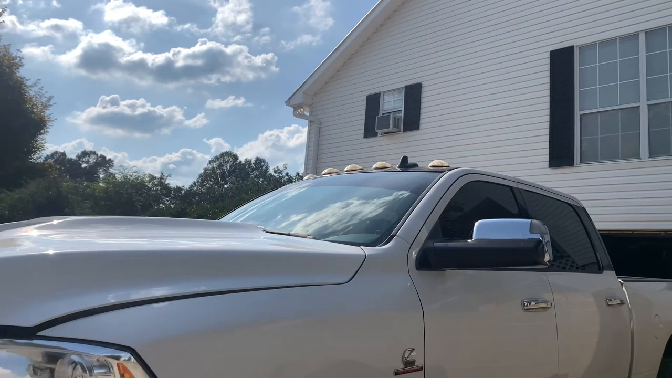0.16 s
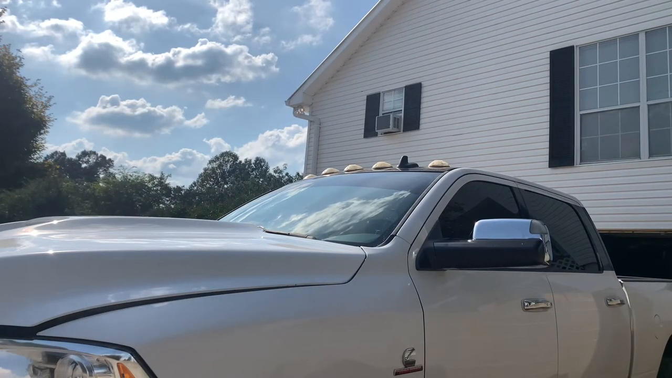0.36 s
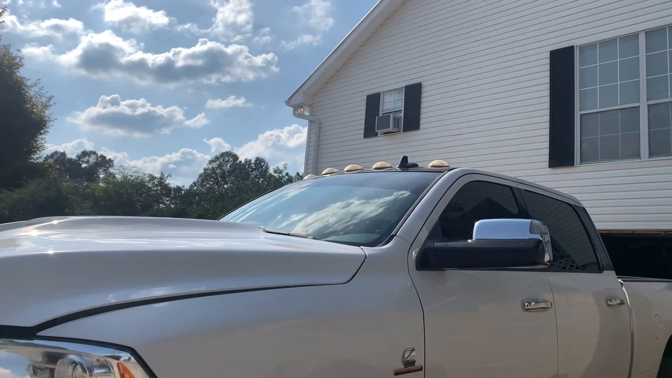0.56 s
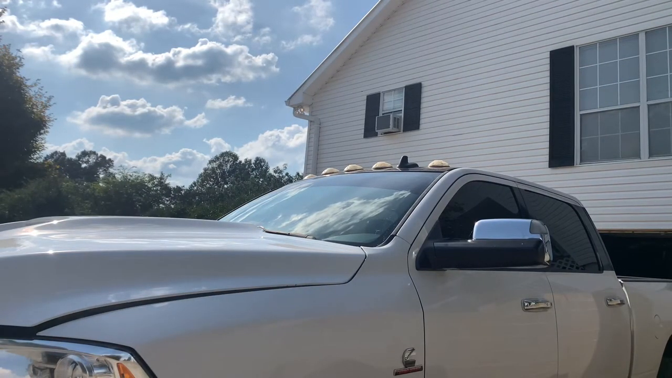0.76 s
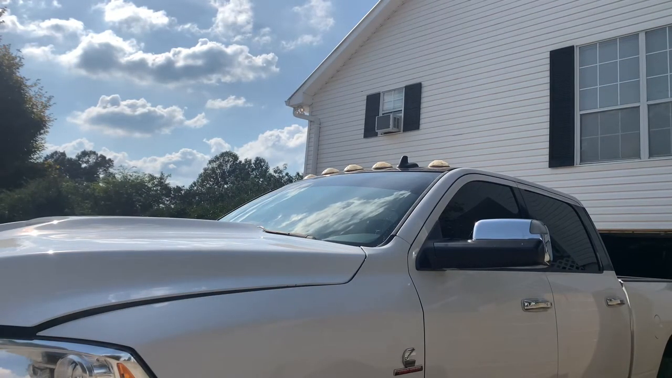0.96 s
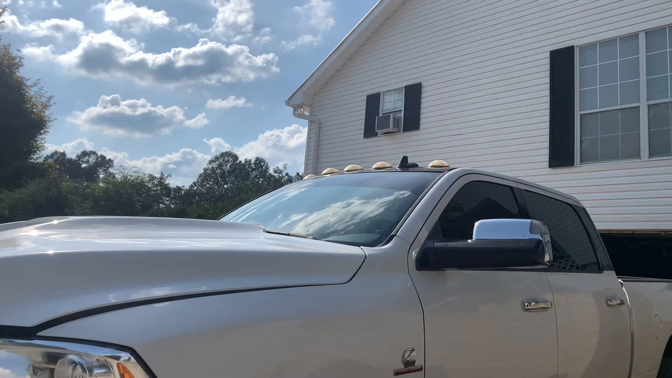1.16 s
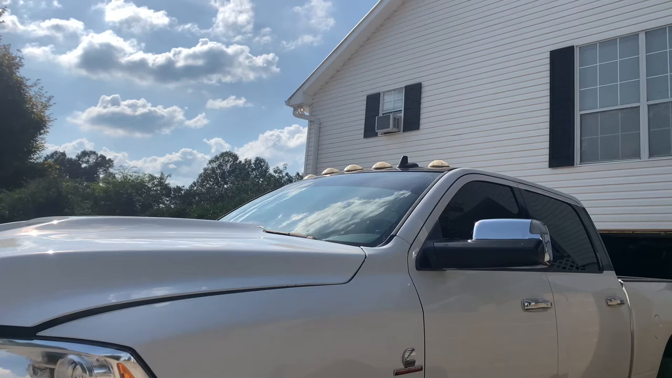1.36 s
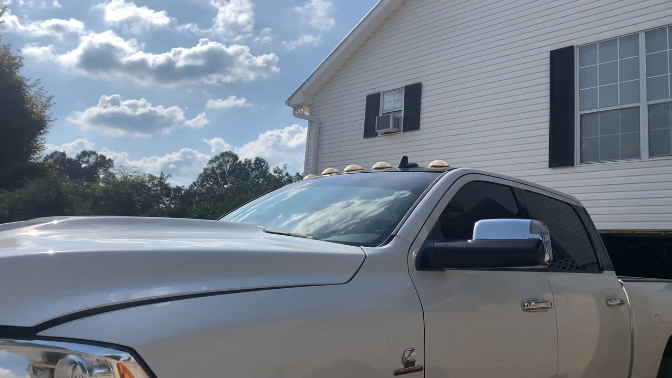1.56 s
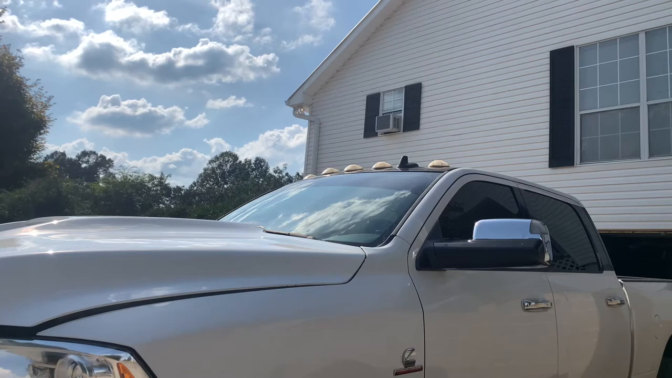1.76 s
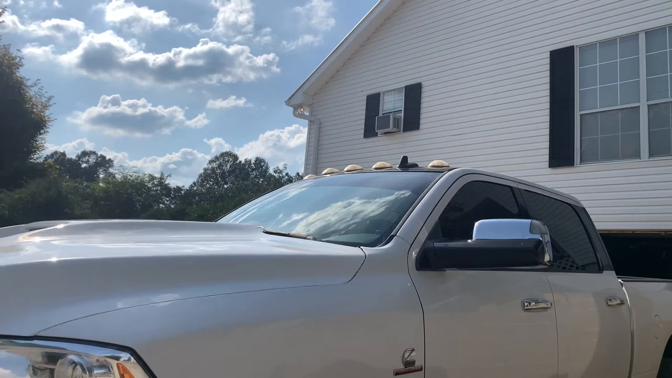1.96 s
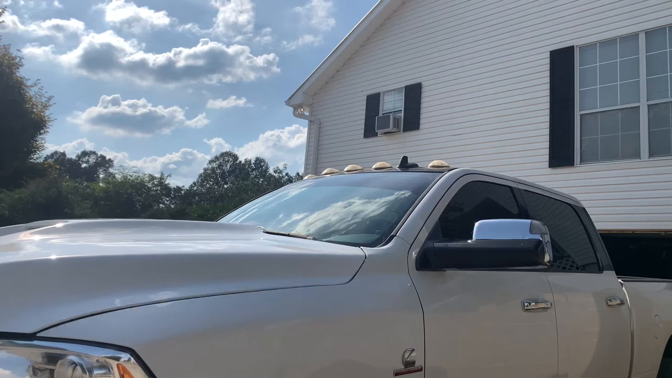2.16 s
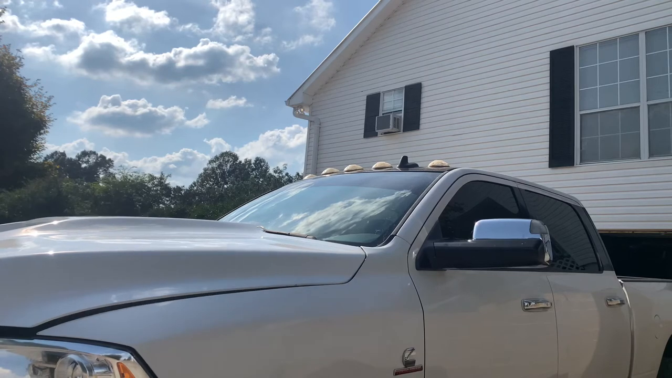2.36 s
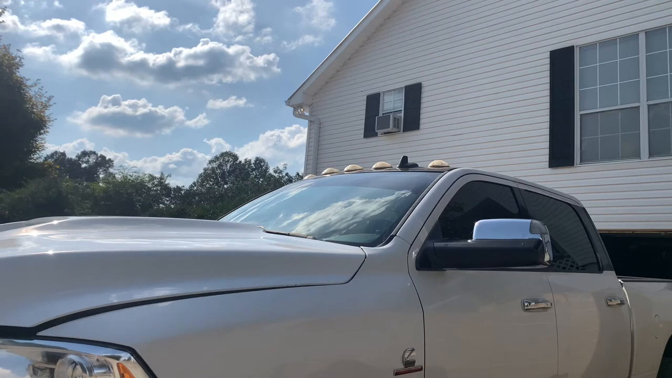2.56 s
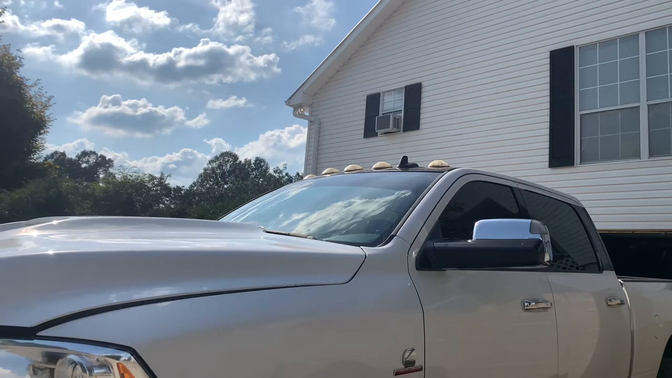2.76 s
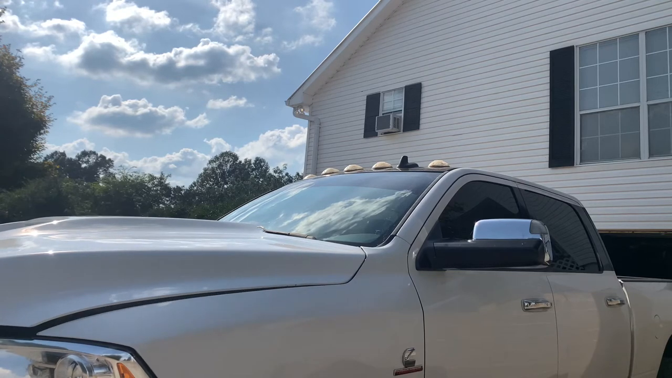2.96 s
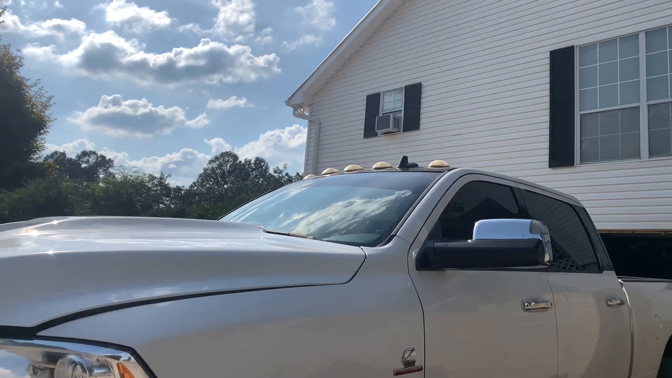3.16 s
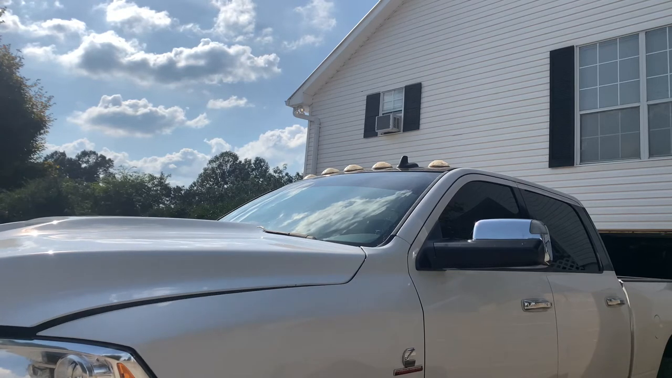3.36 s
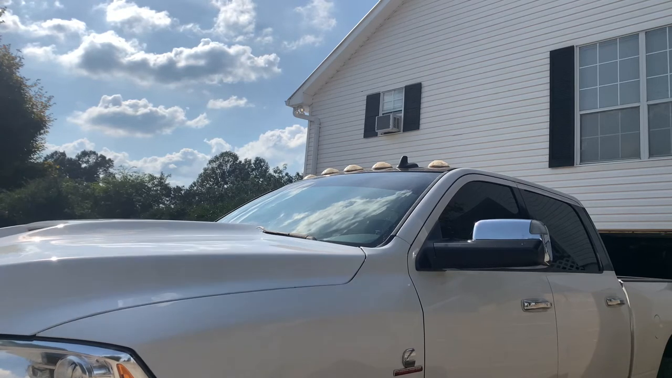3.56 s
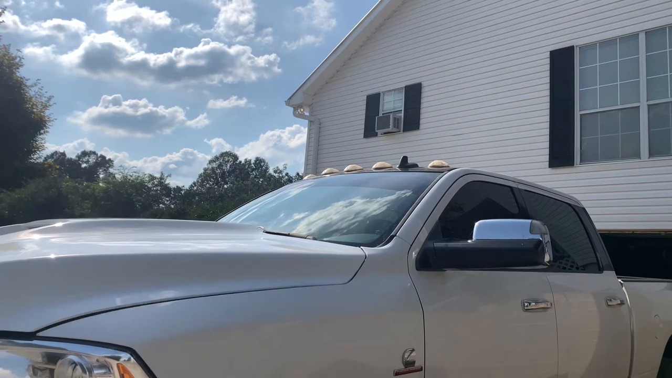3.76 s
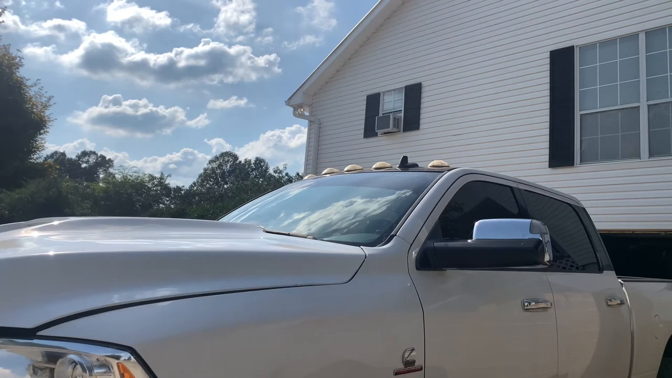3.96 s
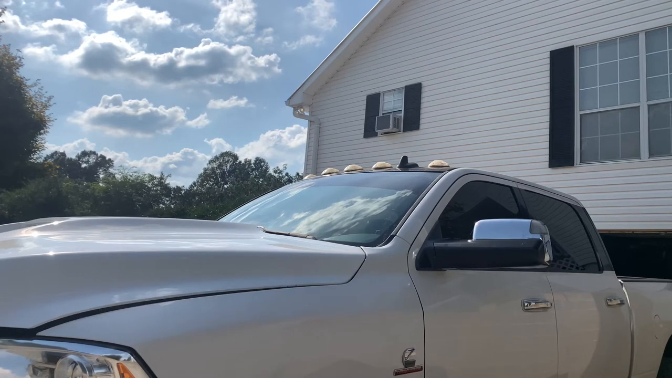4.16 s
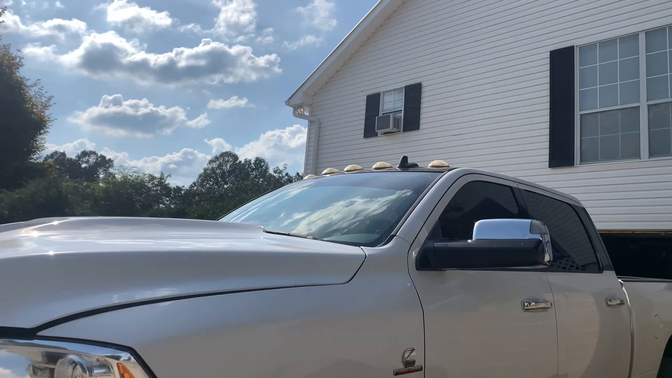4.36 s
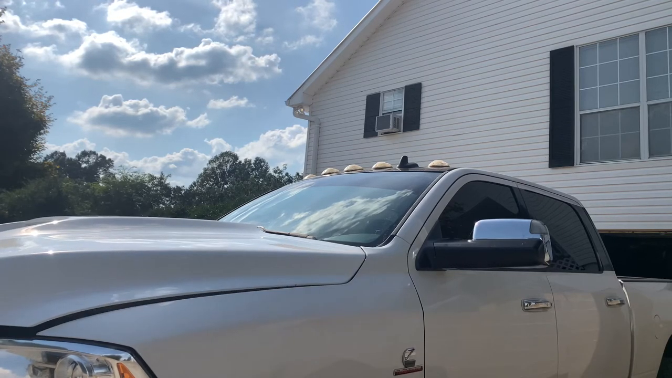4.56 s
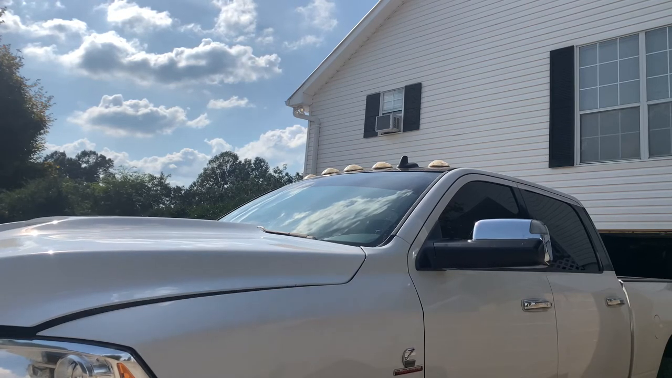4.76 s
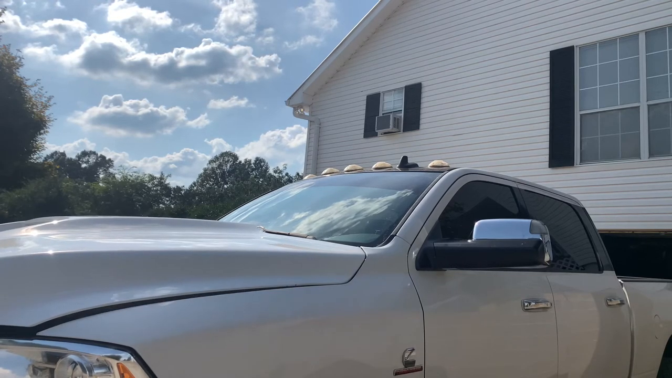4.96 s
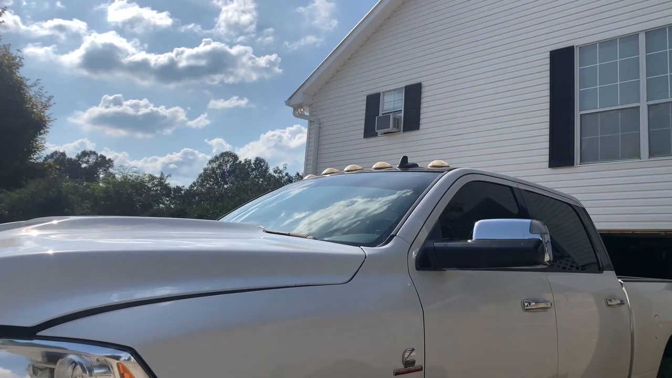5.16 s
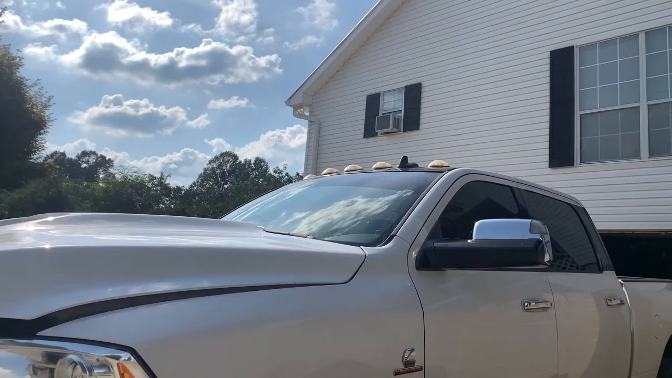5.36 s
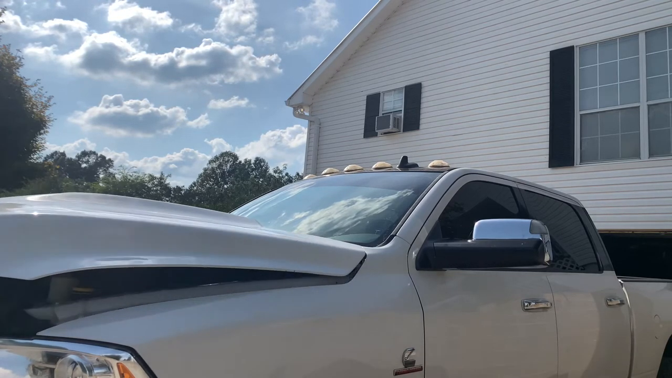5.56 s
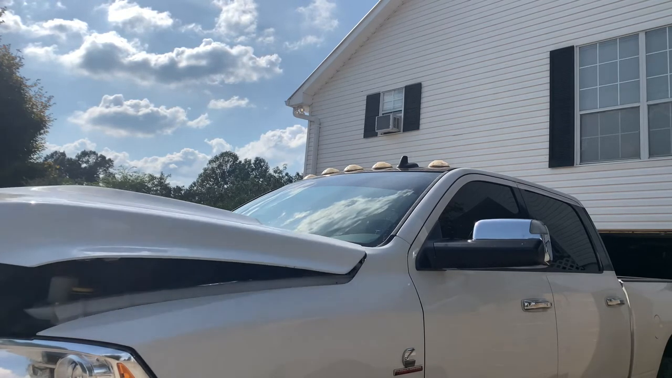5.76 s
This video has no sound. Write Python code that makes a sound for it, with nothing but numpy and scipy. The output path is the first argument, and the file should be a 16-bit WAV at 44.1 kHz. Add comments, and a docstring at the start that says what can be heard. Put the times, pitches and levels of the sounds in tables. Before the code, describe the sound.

A quiet yard with a low, slightly wavering machine hum, soft air, faint high hiss and far traffic that fades. From 0.1 to 0.6 s, hands scuff lightly on paint and a couple of small steel latch parts tick. At about 1.94 s the fiberglass hood slams onto its latch: a sharp steel crack, then a heavy hollow thump with deep boom, quick rebounds and a short panel shudder, answered by a diffuse house-wall echo. A faint latch touch follows at 2.2 s. A second slam lands at 3.43-3.55 s, similarly hard, and a small touch follows at 3.78 s. From 4.0 to 5.0 s, hands rub with dry little squeaks and the catch is fumbled in quick metallic clicks. A dull light knock comes at 5.03 s, then at 5.36 s the catch releases with a bright bang and brief springy rattling bounce, dying back into the hum by about 5.8 s.

```python
"""First a quiet outdoor bed is heard: a machine hum, air, two bands of hiss and far traffic that fades and wavers.
Hands scuff and squeak on paint (shaped noise) and small steel parts tick (short spikes with a ring).
A fibreglass pickup hood is pushed down onto its latch twice; then the catch is fumbled and lets go with a bang.
Each contact mixes bursts of noise with dying tones, from the steel latch down to the air under the hood.
A house wall and the yard answer with diffuse echoes, and two microphone ports make the stereo picture."""
import sys
import numpy as np
from scipy import signal
from scipy.fft import rfft, irfft, next_fast_len
from scipy.io import wavfile
from scipy.ndimage import map_coordinates

SR = 44100
rng = np.random.default_rng(int(sys.argv[2]) if len(sys.argv) > 2 else 0)


def wav_record(signal):
    """Record a signal, one row per channel, as 16-bit PCM in the file named by sys.argv[1]."""
    frames = np.transpose(np.atleast_2d(signal))
    bounded = np.clip(frames, -1, 1)
    # unit amplitude maps onto the largest positive 16-bit level
    quanta = np.round(bounded * 32767).astype(np.int16)
    wavfile.write(sys.argv[1], SR, quanta)


N = 256662  # length in samples

# Levels in the tables are set before the echoes and the microphone ports.
# far traffic over time: time_s, level_db
TRAFFIC_LEVEL = [(0, -57), (.5, -62), (1.2, -62.5), (1.8, -63.5), (2.5, -67.5), (3.4, -75), (4.1, -68.5),
                 (4.7, -73.5), (5.82, -69)]
# colour of the far traffic and of the air: frequency_hz, gain_db
TRAFFIC_COLOUR = [(250, -36.5), (500, -11), (1000, 1), (1800, 0), (2500, -11), (5000, -21.5), (8000, -54.5)]
AIR_COLOUR = [(25, -30), (45, 2.5), (75, -5), (130, -1.5), (250, -13), (320, -17.5), (700, -21),
              (1200, -27), (2000, -33), (4000, -47), (6000, -51), (9200, -48.5), (12000, -55),
              (15000, -72.5)]
# narrow bands of the machine hum, and the two bands of hiss: centre_hz, width_hz, level_db
HUM_BANDS = [(56.4, 11.3, -46), (113.9, 14, -50), (169, 26, -69), (229.9, 12, -61), (579, 4, -70.5)]
HISS_BANDS = [(7770, 1000, -74.5), (10940, 910, -82.5)]

# how fast the echoes of the house wall and the yard die: frequency_hz, time_to_fall_60_db_s
WALL_DECAY = [(200, 0.6), (1000, 0.22), (3000, 0.19), (10000, 0.11)]
YARD_DECAY = [(200, 0.5), (2000, 1), (10000, 0.54)]

# hands scuffing: middle_s, length_s, level_db, treble_over_body_db
SCUFFS = [(0.113, 0.03, -54.5, -10), (0.322, 0.065, -63, -9), (0.568, 0.027, -52, -8.5),
          (1.732, 0.11, -68.5, -8), (2.444, 0.1, -69, -7), (4.05, 0.1, -61, -15), (4.255, 0.027, -57, -4.5),
          (4.293, 0.043, -57.5, -13), (4.619, 0.077, -64, -15), (4.792, 0.12, -55.5, -5.5),
          (4.888, 0.067, -59.5, -1.5), (4.944, 0.24, -62.5, -10)]
# colour of the scuffs: frequency_hz, gain_db
SCUFF_COLOUR = [(900, -3), (1800, -3.5), (3500, -4.5), (6000, -10), (9000, -0.5), (11000, -10),
                (13000, -13), (16500, -25)]
# skin squeaking on paint: start_s, length_s, pitch_hz, level_db, octave_level_db
SQUEAKS = [(4.022, 0.044, 3370, -52, -20), (4.095, .1, 4300, -75, -12), (4.346, 0.22, 3300, -61.5, -10),
           (4.386, 0.18, 2710, -67, -40), (4.787, 0.15, 3860, -67, -20)]
# small latch parts clicking: start_s, level_db, pitch_hz
TICKS = [(0.223, -39, 3030), (.271, -48, 2230), (4.346, -54, 10300), (4.734, -51, 3060), (4.762, -37, 3300),
         (4.778, -30, 3220), (4.883, -39, 3720), (4.889, -34.5, 3300), (4.915, -47, 3300),
         (4.94, -54.5, 2330)]

# ringing tones of the hood's parts, deepest first: pitch_hz, level_db, time_to_fall_60_db_s
BOOM_TONES = [(66.5, 21, 0.36), (78.7, -4.5, 0.73)]  # the air under the hood
HOLLOW_TONES = [(114.4, 0, 0.31)]
DRUM_TONES = [(159, -3.5, 0.37), (176.6, -1.5, .25), (223.8, 6.5, 0.1266), (261, -3.5, 0.24)]
PANEL_TONES = [(291, -1, .28), (335, -3, .2), (377, 0, .22), (405, -3, .24), (470, -4, .22), (490, -6, .24),
               (540, -6, .24)]
RIB_TONES = [(583, -10, 0.42), (663.4, 2, 0.14), (756.3, 1, 0.16), (809, -3.5, 0.25), (899, 6.5, 0.036),
             (944, 2, 0.079), (1025, 1.5, 0.075), (1120, -3, 0.049)]
CLACK_TONES = [(1360, -4.5, .06), (1490, -18, .06), (1474, 2, .07), (1639, 27, 0.042), (1835, 7, 0.027),
               (1850, -13, 0.036)]
STEEL_TONES = [(2740, 2.5, 0.052), (3187, 0.5, 0.086), (3330, 3, 0.044), (3890, -7.5, 0.043),
               (4360, -3, 0.033), (4780, -9, 0.018), (5400, -8, 0.018), (5650, -2, 0.02)]  # the latch

# colours of the noise in a contact: frequency_hz, gain_db
CRACK_COLOUR = [(1800, -19.5), (2400, -0.5), (4300, -10.5), (5600, -8), (6600, -20), (7400, -42)]
FIZZ_COLOUR = [(5800, -26), (6600, -2.5), (8000, 2.5), (9000, 4.5), (11500, -1.5), (12800, 4.5),
               (13800, -16), (15500, -9), (17000, -42.5)]
RATTLE_COLOUR = [(550, -30), (800, 0), (1200, -2), (2000, -8), (2700, -30)]

# every contact: start_s, metal_db, body_db, depth_db (gained per octave down the body)
STRIKES = [(1.935, -17, -18.5, 2), (3.4565, -13.5, -25, -1)]  # the latch meets its steel striker
TOUCHES = [(2.1957, -42.5, -38.5, -8.5), (3.4276, -37, -26.5, 3), (3.7814, -46.5, -41.5, -4),
           (5.0255, -38, -30.5, -2)]  # the latch only brushes or leaves it
KNOCKS = [(1.9574, -9, -7.5, 1), (2.0074, -19.5, -26.5, 4.5), (2.0544, -36, -33.5, 3),
          (3.4764, -9.5, -13, -3.5), (3.5274, -18, -18, 5)]  # the hood lands on its stops and rebounds
SHUDDERS = [(1.9454, -30, -16, -2.5), (1.9684, -44, -17, 3), (1.9944, -48, -23, 7), (2.0294, -53, -31.5, 8),
            (2.204, -48, -43.5, -6), (3.4664, -30.5, -8.5, 1.5), (3.4914, -49, -21.5, 9),
            (3.5094, -37, -47, -2), (3.5544, -67, -27.5, 2.5), (3.7954, -56, -47.5, -11.5),
            (5.0343, -41.5, -32.5, -7.5), (5.0744, -64, -38, -4)]  # the panel flexes after a blow
RELEASE = [(5.3587, -8, -12, -4), (5.3704, -16, -14, 2), (5.3874, -30, -17.5, -1),
           (5.4099, -51, -28.5, 5.5), (5.4364, -56, -28.5, 10.5)]  # the catch lets go and the hood bounces on its spring

# what each kind of contact excites, as four entries:
# (steel_db, fizz_db, clack_db) over the metal level,
# (ribs_db, panel_db, drum_db, hollow_db, boom_db) over the body level,
# (ribs_tilt, panel_tilt, drum_tilt) in dB per octave, buzz_s (time to fall 60 dB)
STRIKE_MIX = (0, -9, -18.5), (1.5, 0, 5, -2.5, -14), (-11, 3.6, 0), 0.062
TOUCH_MIX = (0, -5.5, -5), (-6.5, -0.5, -7.5, -5, -11.5), (-13.5, 4.2, 0), 0.069
KNOCK_MIX = (-19, -39, 0), (1, -18, 0.5, -27, -2.5), (4, 0, -7), 0.11
SHUDDER_MIX = (0, -19.5, -2), (-6, 2, 3, -5, -5.5), (0, 0, 0), 0.19
RELEASE_MIX = (0, -8, -2.2), (0, -0.5, -3.5, -8.5, -19), (8.8, -6.5, -6.5), 0.089

# where the steel rings most, in Hz
STRIKE_HZ, TOUCH_HZ, KNOCK_HZ, SHUDDER_HZ, RELEASE_HZ = 3970, 3200, 3450, 2840, 4800

# how alike the two microphone ports hear near and far sound: frequency_hz, likeness (0 to 1)
NEAR_ALIKE = [(60, .99), (300, .98), (600, .92), (1200, .75), (2300, .5), (5000, .7), (7500, .92),
              (8300, .995), (16000, .995)]
FAR_ALIKE = [(60, 0.99), (300, 0.89), (700, 0.69), (1500, 0.085), (5000, 0.11), (7500, 0.24), (8500, 0.96),
             (16000, .99)]
# how far the left port is ahead in phase: frequency_hz, left_lead_radians
NEAR_LEAD = [(0, 0), (2240, 3.0), (2930, 3.5), (3530, 5.6), (5680, 9.3), (6370, 12.8), (7580, 10.3),
             (9300, 8.8), (10400, 6.4), (11500, 6.1), (12800, 3.3), (14400, 2.9), (15100, -0.0),
             (16500, 0.1)]
FAR_LEAD = [(0, 0), (780, -0.3), (4570, 1.4), (6370, 6.2), (6890, 6.1), (7580, 10.2), (8010, 10.0),
            (9560, 8.8), (10400, 6.2), (11900, 6.3), (12500, 3.3), (14400, 3.0), (14900, -0.1),
            (16500, 0.1)]
# balance of the ports: frequency_hz, left_over_right_db
NEAR_LEAN = [(60, 3), (150, 3.5), (380, 5.5), (950, 6), (2380, 1.5), (5980, -2.5), (15000, 1.5)]
FAR_LEAN = [(60, 0.5), (180, 2), (550, 2), (1650, 1.4), (4970, -1.5), (15000, -0.5)]

TOP_HZ = 16500  # nothing is kept from here up
FULL_SCALE = .95  # ceiling of the peak rounding


def amp(db):
    """Turns a level in dB into a gain."""
    return 10 ** (np.asarray(db) / 20)


def unit(x):
    """Scales a signal to an average (rms) strength of 1."""
    return x / np.sqrt(np.mean(x ** 2) + 1e-20)


def along(points, hz):
    """Reads a value between (Hz, value) points, on a log frequency axis."""
    point_hz, values = np.transpose(points)
    return np.interp(np.log(hz + 1), np.log(point_hz + 1), values)


def filtered(x, response):
    """Changes the strength and phase of each frequency in x."""
    size = next_fast_len(N + SR // 2)  # spare room at the end
    spectrum = rfft(x, size) * response(np.fft.rfftfreq(size, 1 / SR))
    return irfft(spectrum, size)[..., :N]


def wobble(rate):
    """Draws a smooth random curve through `rate` random points a second."""
    points = rng.standard_normal(int(N * rate / SR) + 4)
    return map_coordinates(points, [np.arange(N) * rate / SR])


def noise(gain):
    """Makes two unrelated noises of rms 1, coloured by a gain over frequency."""
    return unit(filtered(rng.standard_normal((2, N)), gain))


def coloured_noise(colour):
    """Makes two unrelated noises with the colour of a table."""
    return noise(lambda hz: amp(along(colour, hz)))


def background():
    """Distant sources and air are steady noises in bands; the traffic level follows its table."""
    t = np.arange(N) / SR
    time_s, level_db = np.transpose(TRAFFIC_LEVEL)
    traffic_db = np.interp(t, time_s, level_db) + 0.15 * wobble(9.5)
    out = amp(traffic_db) * coloured_noise(TRAFFIC_COLOUR)
    out += amp(-47.5) * coloured_noise(AIR_COLOUR)
    # a narrow band of noise sounds like a wavering tone
    for centre, width, db in HUM_BANDS:
        out += amp(db) * noise(lambda hz: 1 / (1 + (2 * (hz - centre) / width) ** 2))
    for centre, width, db in HISS_BANDS:
        out += amp(db) * noise(lambda hz: 1 / (1 + (2 * (hz - centre) / width) ** 4))
    return out


def echo(x, decays, delay):
    """A rough surface gives a diffuse answer without deep bass; each frequency dies at its own speed."""
    hz, t, grid = signal.stft(rng.standard_normal((2, SR)), SR, nperseg=256)
    dying = grid * amp(-60 * t / along(decays, hz)[:, None])
    tail = signal.istft(dying, SR, nperseg=256)[1]
    late = np.pad(x, (round(delay * SR), 0))[None]
    wet = signal.fftconvolve(late, tail / np.linalg.norm(tail[0]), axes=1)[:, :N]
    return filtered(wet, lambda hz: (1j * hz / (1j * hz + 250)) ** 2)


def hands():
    """Skin rubs as grainy noise that swells and fades; squeaks are rough bands with their octave."""
    t = np.arange(N) / SR
    dull = noise(lambda hz: amp(along(SCUFF_COLOUR, hz)) * (hz < 6000))
    bright = noise(lambda hz: amp(along(SCUFF_COLOUR, hz)) * (hz >= 6000))
    grain = amp(2.4 * wobble(250))
    out = np.zeros((2, N))
    for middle, length, db, treble_db in SCUFFS:
        swell = np.exp(-(2 * (t - middle) / length) ** 2)
        out += amp(db) * swell * grain * (dull + bright * amp(treble_db))

    def smeared(pitch, width):
        """The slip rate is unsteady, so a tone smears into a band."""
        return noise(lambda hz: 1 / (1 + ((hz / pitch - 1) / width) ** 2))

    for start, length, pitch, db, octave_db in SQUEAKS:
        first = smeared(pitch, .075)
        second = smeared(2 * pitch, .075 / 2)
        ramps = np.clip(np.minimum(t - start, start + length - t) / 0.035, 0, 1)
        stroke = ramps * amp(3.1 * wobble(40))
        out += amp(db) * stroke * grain * (first + amp(octave_db) * second)
    return out


def ticks():
    """Small steel parts click: a spike of noise with a very short ring."""
    out = np.zeros((2, N))
    t = np.arange(SR // 50) / SR
    for start, db, pitch in TICKS:
        spike = 0.63 * amp(-60 * t / 0.0023) * rng.standard_normal((2, len(t)))
        tone = amp(-60 * t / 0.0063) * np.sin(2 * np.pi * pitch * t)
        out[:, round(start * SR):][:, :len(t)] += amp(db) * (spike + tone)
    return out


def contacts():
    """Each contact shares its force between the parts by its kind, tipped towards the deep parts by its depth."""
    parts = (RIB_TONES, PANEL_TONES, DRUM_TONES, HOLLOW_TONES, BOOM_TONES)
    octaves_down = np.log2([PANEL_TONES[0][0] / part[0][0] for part in parts])
    kinds = [(STRIKES, STRIKE_MIX, STRIKE_HZ), (TOUCHES, TOUCH_MIX, TOUCH_HZ),
             (KNOCKS, KNOCK_MIX, KNOCK_HZ), (SHUDDERS, SHUDDER_MIX, SHUDDER_HZ),
             (RELEASE, RELEASE_MIX, RELEASE_HZ)]
    for rows, (metal_shares, body_shares, tilts, buzz_s), steel_hz in kinds:
        for start, metal_db, body_db, depth_db in rows:
            metal = np.add(metal_shares, metal_db)
            body = body_shares + depth_db * octaves_down + body_db
            yield start, metal, body, steel_hz, tilts, buzz_s


def ring(tones, attack, scatter_db, tilt_db=0, centre_hz=None, linger_db=0, knock=.03):
    """A blow starts a part's tones, each dying at its own speed, with new strengths in two directions."""
    t = np.arange(SR // 2) / SR
    hz, db, t60 = np.transpose(tones)[..., None]
    # tilt per octave: away from centre_hz on both sides if given, else upwards
    octaves = np.abs(np.log2(hz / centre_hz)) if centre_hz else np.log2(hz)
    db = db + tilt_db * octaves
    linger = amp(linger_db)  # the knock dies first, this share rings on
    fall = (linger + (1 - linger) * amp(-60 * t / knock)) * (1 - np.exp(-t / attack))
    waves = amp(db - 60 * t / t60) * np.sin(2 * np.pi * hz * t) * fall
    strengths = amp(scatter_db * rng.standard_normal((2, len(tones))))
    strengths[1] *= rng.choice([-1, 1], len(tones))
    return strengths @ waves / np.linalg.norm(amp(db))


def hood():
    """Every contact cracks and rattles the latch and rings the hood from its steel down to its boom."""
    out = np.zeros((2, N + SR))
    t = np.arange(SR // 2) / SR
    noises = [coloured_noise(colour) for colour in (CRACK_COLOUR, FIZZ_COLOUR, RATTLE_COLOUR)]
    crack, fizz, rattle = np.pad(noises, ((0, 0), (0, 0), (0, SR)), "wrap")
    high, low = 2.5, .8  # dB of scatter from blow to blow, for upper and deep parts
    for start, metal, body, steel_hz, tilts, buzz_s in contacts():
        steel_db, fizz_db, clack_db = metal
        rib_db, panel_db, drum_db, hollow_db, boom_db = body
        rib_tilt, panel_tilt, drum_tilt = tilts
        now = slice(round(start * SR), round(start * SR) + len(t))

        # a sharp front, then loose parts buzz on
        front_and_buzz = amp(-60 * t / 0.0034) + amp(-4 - 60 * t / buzz_s)
        fall = front_and_buzz * (1 - np.exp(-t / 0.00035))
        steel = ring(STEEL_TONES, 0.0012, high, -47.0, steel_hz, linger_db=-10.5, knock=0.023)
        out[:, now] += amp(steel_db) * (amp(-9) * fall * crack[:, now] + steel)
        out[:, now] += amp(fizz_db) * fall * fizz[:, now]
        out[:, now] += amp(clack_db) * ring(CLACK_TONES, 0.00031, high, linger_db=-23, knock=0.027)

        ribs = ring(RIB_TONES, 0.0018, high, rib_tilt, linger_db=-15.5, knock=0.22)
        rib_rattle = amp(-10.5 - 60 * t / 0.084) * rattle[:, now]
        out[:, now] += amp(rib_db) * (ribs + rib_rattle)
        panel = ring(PANEL_TONES, 0.0031, high, panel_tilt, linger_db=-15.5, knock=0.27)
        out[:, now] += amp(panel_db) * panel
        out[:, now] += amp(drum_db) * ring(DRUM_TONES, 0.0049, low, drum_tilt)
        out[:, now] += amp(hollow_db) * ring(HOLLOW_TONES, 0.0065, low)
        out[:, now] += amp(boom_db) * ring(BOOM_TONES, .007, low)
    return out[:, :N]


def ports(pair, alike, lead, lean):
    """Two microphone ports hear a shared and an opposed part, with a phase lead and a balance."""
    def mix(hz):
        angle = np.arccos(np.clip(along(alike, hz), 0, 1)) / 2
        return np.array([np.cos(angle), np.sin(angle)])

    def left_and_right(hz):
        # half of the lead and balance goes to each side
        half = amp(along(lean, hz) / 2) * np.exp(.5j * np.interp(hz, *np.transpose(lead)))
        return np.array([half, 1 / half])

    shared, opposed = filtered(pair, mix)
    return filtered(np.array([shared + opposed, shared - opposed]), left_and_right)


def scene():
    """Near sounds, answered by the wall and the yard, join the far bed through the microphone ports."""
    far = ports(background(), FAR_ALIKE, FAR_LEAD, FAR_LEAN)
    near, clicks = hands() + hood(), ticks()
    heard = near[0] + clicks[0]  # what the wall and yard answer
    near = near + amp(-12.0) * echo(heard, WALL_DECAY, delay=.011)
    near = near + amp(-30) * echo(heard, YARD_DECAY, delay=0.037)
    clicks = ports(clicks, NEAR_ALIKE, FAR_LEAD, FAR_LEAN)
    return far + clicks + ports(near, NEAR_ALIKE, NEAR_LEAD, NEAR_LEAN)


def record(dry):
    """The microphones lose the deepest bass, loud peaks are rounded off and the top is cut away."""
    x = filtered(dry, lambda hz: (1j * hz / (1j * hz + 35)) ** 2)
    x = x / (1 + np.abs(x / FULL_SCALE) ** 4) ** (1 / 4)
    return filtered(x, lambda hz: hz < TOP_HZ)


dry = scene()
out = record(dry)
wav_record(out)
```